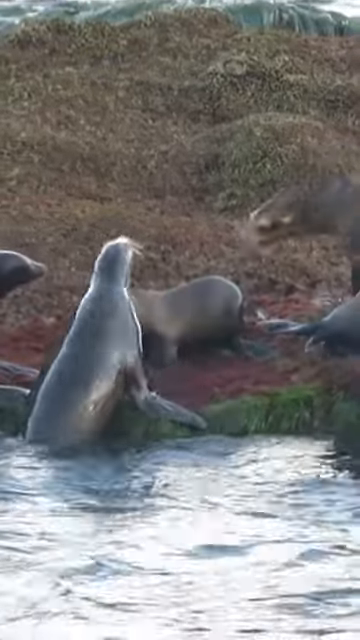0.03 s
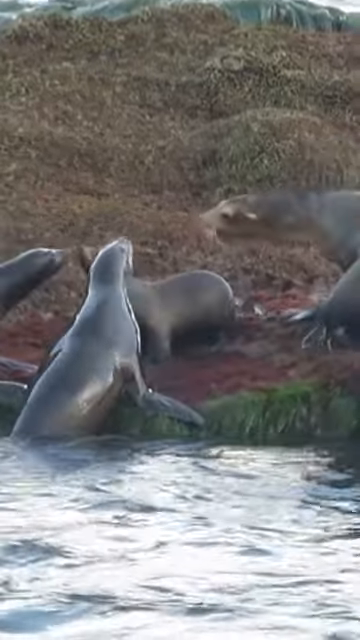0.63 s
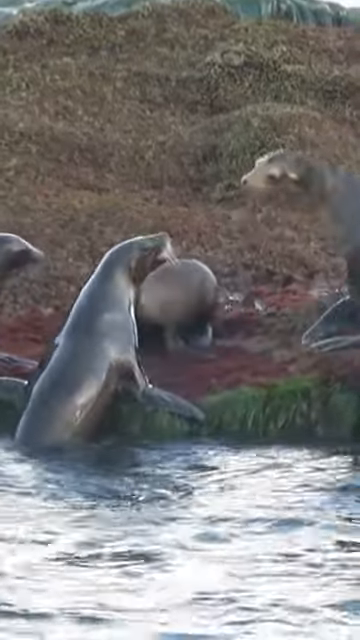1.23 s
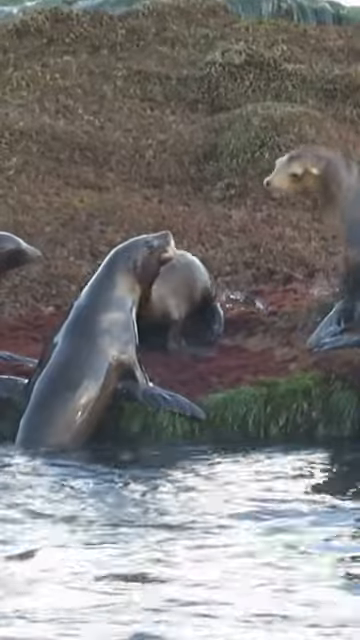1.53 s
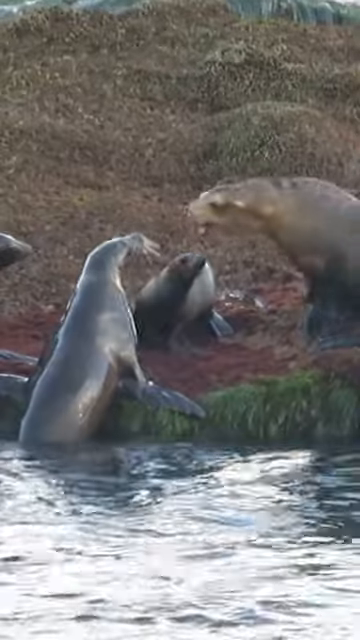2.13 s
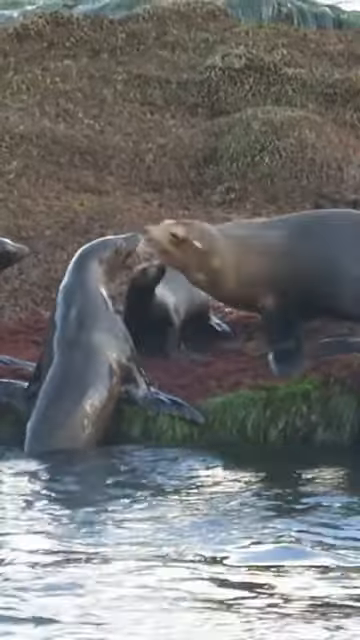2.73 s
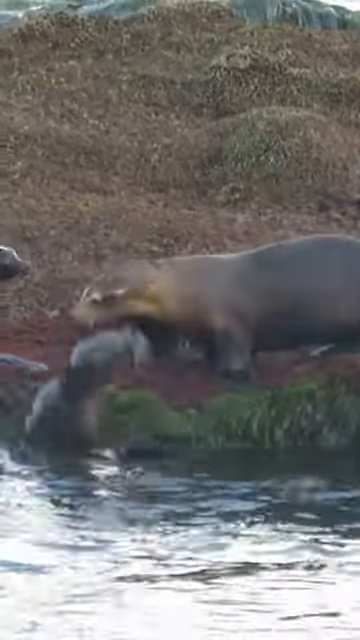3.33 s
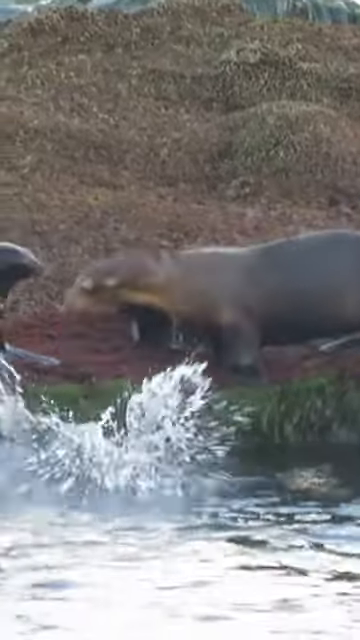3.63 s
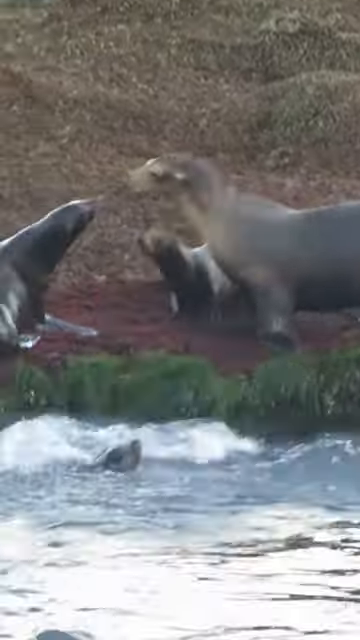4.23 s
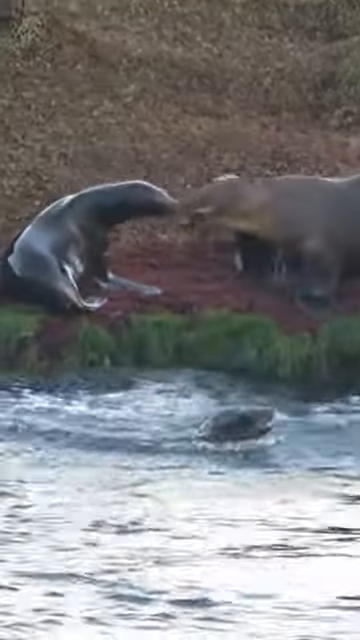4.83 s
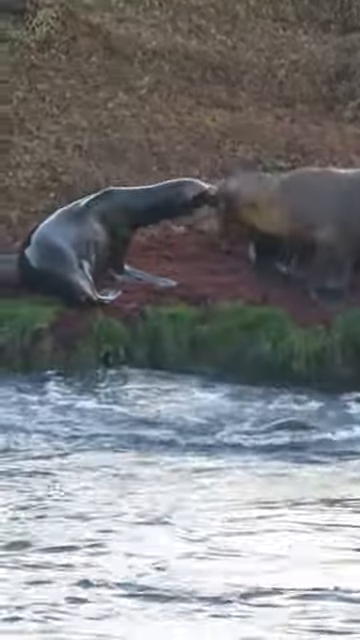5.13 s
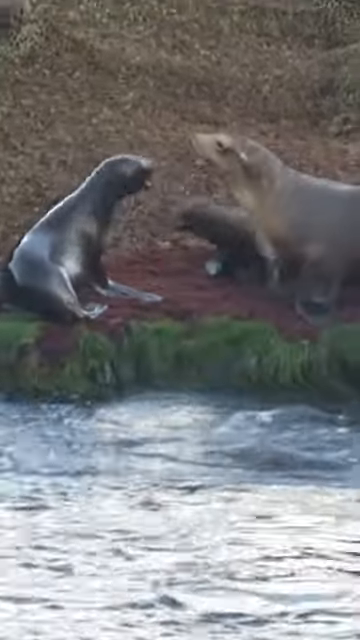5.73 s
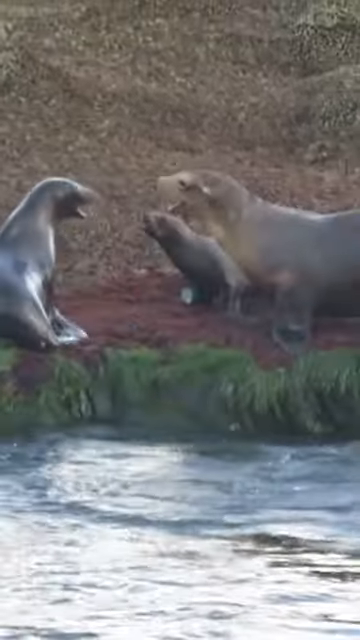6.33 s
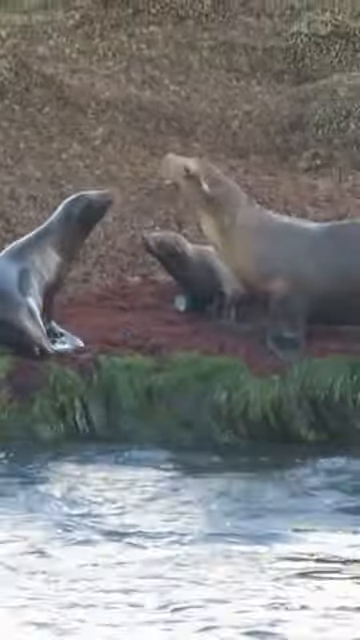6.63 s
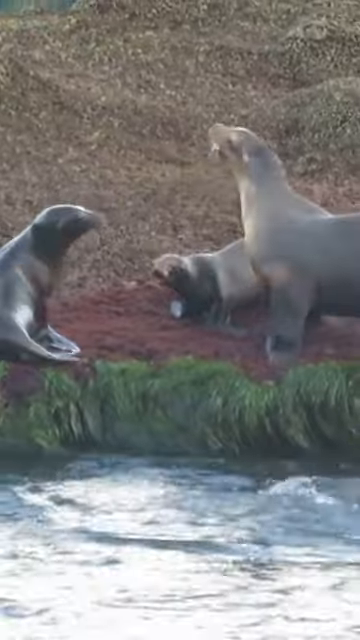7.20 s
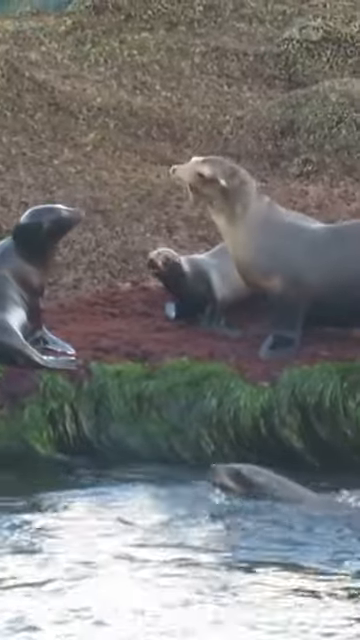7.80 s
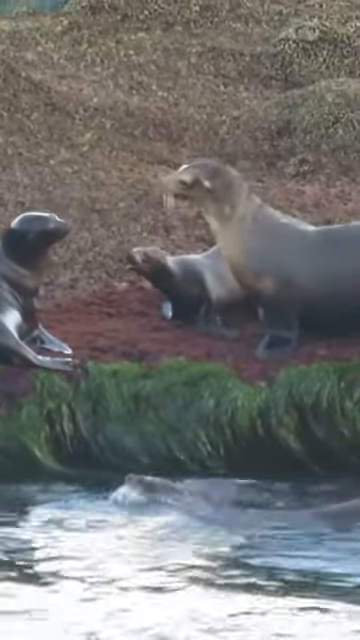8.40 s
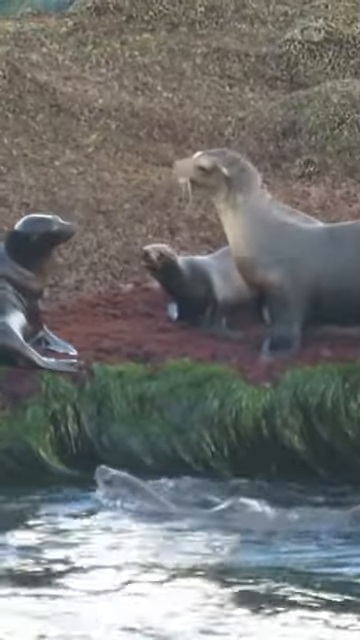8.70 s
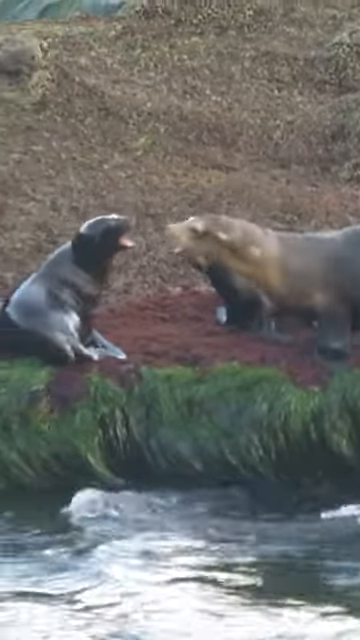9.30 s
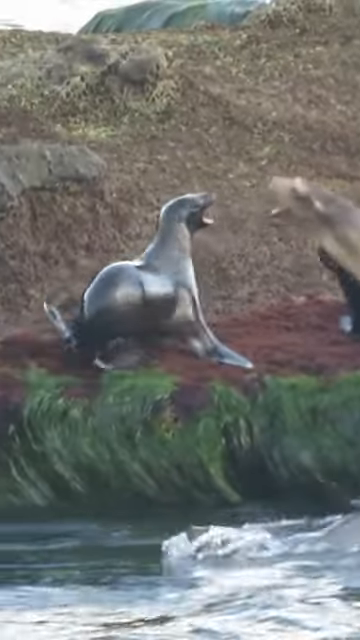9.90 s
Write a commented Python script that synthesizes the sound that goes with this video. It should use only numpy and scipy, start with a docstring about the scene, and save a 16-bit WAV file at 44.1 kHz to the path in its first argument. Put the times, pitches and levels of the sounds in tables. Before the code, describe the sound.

Sea lions moan and bleat throughout on a rocky shore, some calls round and clear, others hoarse, with short swooping yelps among them. Surf rumbles behind, under a wide hiss of foam and a faint low hum. About three seconds in, the hand-held microphone takes a rebounding bump. A faint tap and one deep growl follow past the middle. Everything but the hiss sounds muffled.

```python
"""Sea lions moan, yelp and growl on a rocky shore across the water, their uneven vocal folds turning
the calls hoarse. Surf rumbles behind them, foam bubbles merge into a wide hiss, and a faint drone hums.
A hand-held camera takes one rebounding bump and later a faint tap. All but the hiss and one dry knock
is muffled, cut off steeply near 500 Hz, with the left side leading."""
import sys
import numpy as np
from scipy import signal
from scipy.fft import rfft, irfft
from scipy.io import wavfile

SR = 44100
rng = np.random.default_rng(int(sys.argv[2]) if len(sys.argv) > 2 else 0)


def wav_record(signal):
    """Record a signal, one row per channel, as 16-bit PCM in the file named by sys.argv[1]."""
    frames = np.transpose(np.atleast_2d(signal))
    bounded = np.clip(frames, -1, 1)
    # unit amplitude maps onto the largest positive 16-bit level
    quanta = np.round(bounded * 32767).astype(np.int16)
    wavfile.write(sys.argv[1], SR, quanta)


N = 438794
TIME = np.arange(N) / SR
FREQ = np.fft.rfftfreq(N, 1 / SR)


def voice(calls, harmonics, jitter, swell_db, fade_s=0.025):
    """Uneven vocal folds: each call bends along one pitch arc. Harmonics are (multiple, level_db)."""
    waver, shimmer = wander(28), wander(45)
    out = np.zeros(N)
    for start, length, start_hz, mid_hz, end_hz, peak_db, peak_at, rough in calls:
        span = (TIME > start) & (TIME < start + length)
        along = (TIME[span] - start) / length
        pitch_hz = np.polyval(np.polyfit([0, .5, 1], [start_hz, mid_hz, end_hz], 2), along)
        phase = 2 * np.pi * np.cumsum(pitch_hz * (1 + jitter * rough * waver[span])) / SR
        tone = np.sqrt(2) * sum(undb(db) * np.sin(k * phase) for k, db in harmonics)
        swell = undb(peak_db - swell_db * np.interp(along, [0, peak_at, 1], [1, 0, 1]))
        fade = np.minimum(np.minimum(along, 1 - along) * length / fade_s, 1)
        rasp = (1 + rough * shimmer[span]) / np.hypot(1, rough)
        out[span] += tone * swell * fade * rasp
    return out


# Moan cues: start_s, length_s, start_hz, mid_hz, end_hz, peak_db, peak_position (0-1), roughness (0-1)
MOANS = [ (.27, .16, 472, 466, 454, -36.5, 0.36, 0), (.44, 0.1, 450, 462, 480, -31, 0.64, 0.2),
         (.36, 0.33, 270.2, 299, 297, -34.5, 0.1, 0.77), (1.17, 0.079, 324, 343, 355, -32.5, .5, 0.5),
         (1.58, 0.41, 480.4, 433.2, 478, -38, 0.5, 0.2), (1.63, 0.36, 260.3, 264.6, 277, -32, 0.15, 0.3),
         (2.0, 0.4, 282.4, 290, 307, -36.5, 0.52, 0.55), (2.02, 0.36, 484, 490, 476, -33, 0.45, 0.54),
         (2.28, 0.44, 159.4, 214, 220, -34.5, 0.7, 0.03), (2.57, 0.49, 460.6, 472.7, 471, -34, 0, 0.71),
         (3.28, 0.21, 279, 273, 257, -35.5, 0.33, 0.1), (4.0, 0.21, 340, 329.4, 336, -34, 0, 0.15),
         (4.57, 0.25, 443, 450, 453, -35.5, 0.53, 0.35), (4.64, 0.25, 418, 415, 427, -32.5, 0.53, 0.12),
         (4.97, 0.49, 425, 440, 498, -34.5, 0.7, 0.37), (5.0, 0.45, 253, 262, 288, -37, 0.94, 0.4),
         (5.03, 0.16, 293, 285, 281, -33, 0.3, 0.3), (5.42, .46, 296, 343.7, 359, -33, 0.78, 0.33),
         (5.59, 0.25, 262.4, 245.3, 239, -28, 0.14, 0.32), (5.83, 0.24, 240.4, 229.3, 188, -36, 0.15, 0.6),
         (6.25, 0.26, 335.5, 385, 418, -36.5, 0.66, 0.28), (6.4, 0.41, 305, 320.4, 294, -36, 0.25, 0.2),
         (6.45, 0.65, 222, 222, 216.5, -35.5, 0.62, 0.41), (6.96, 0.15, 372, 363.6, 357, -38, 0.3, 0.2),
         (7.05, 0.264, 303.3, 305.4, 330, -37.5, 0.67, 0.3), (7.08, 0.13, 486, 496, 488, -35, 0.5, 0.36),
         (7.3, 1.35, 216, 222.9, 224.1, -35, 0.28, 0.26), (7.55, 0.29, 348, 352, 348, -36.5, 0.46, 0.21),
         (7.8, 0.35, 274.2, 301, 307, -34.5, 0.75, 0.3), (8.14, 0.35, 289.8, 261.3, 234, -34.5, 0.7, 0.13),
         (8.54, 0.1, 465, 483, 480, -36.5, .5, .7), (8.9, 0.7, 202, 208.7, 210, -37, 0.04, 0.4),
         (8.97, 0.22, 140.8, 154.2, 194, -33.5, .55, 0.14), (9.15, 0.25, 401.4, 366, 341, -37.5, 0.2, 0.16),
         (9.2, 0.32, 188, 165.4, 140, -39.5, 0.55, 0.33), (9.49, 0.114, 375, 381, 382, -34.5, 0.6, .25),
         (9.58, 0.3, 409.4, 402, 385, -38.5, 0.86, 0.13), ]

def moans(trim_db=-1):
    """The nearer sea lions moan and bleat in round, almost pure tones, clear or hoarse."""
    return undb(trim_db) * voice(MOANS, [(1, 0), (2, -16)], jitter=.04, swell_db=8)


# Yelp cues: start_s, length_s, start_hz, mid_hz, end_hz, peak_db, peak_position (0-1), roughness (0-1)
YELPS = [ (.885, .2, 424.3, 298.2, 365, -30.5, 0.41, 0.48),
         (1.385, 0.14, 360, 269.6, 294, -30.5, 0.46, 0.27), (3.868, 0.15, 361, 264.4, 350, -31, 0.19, .35),
         (4.36, .13, 344, 305.5, 350, -32.5, 0.54, 0.22), (4.865, 0.11, 350, 304, 335, -29.5, 0.5, .2),
         (8.98, 0.1325, 280, 289, 340, -35.5, 0.66, 0.18), (9.43, 0.17, 314.7, 309, 363, -32.5, 0.26, 0.22),
         (9.85, 0.091, 396, 307, 330, -35, 0.7, 0.24), ]

def yelps():
    """Short, brighter calls with a quicker attack, most swooping down and up again."""
    return voice(YELPS, [(1, 0), (2, -12)], jitter=.04, swell_db=5, fade_s=.018)


# Growl cue: start_s, length_s, start_hz, mid_hz, end_hz, peak_db, peak_position (0-1), roughness (0-1)
GROWL = (5.5, 0.63, 59.5, 57, 49.5, -35, 0.5, 0.16)

def growl(trim_db=1):
    """Slowly pulsing vocal folds: one deep growl, carried by its low harmonics with no fundamental."""
    return undb(trim_db) * voice([GROWL], [(2, -6), (3, 0), (4, -7), (6, -13)], jitter=.06, swell_db=8)


def far_colony(trim_db=-3, lowest_hz=135, octaves=1.5, length_s=.3, glide_oct=.0698, rough=.26, count=90):
    """Farther animals overlap in a bed of short, gliding moans that rides the surf's rumble level."""
    calls = []
    for when, pitch, stretch, slope in rng.random((count, 4)):
        length = length_s * (.5 + stretch)
        glide = glide_oct * (2 * slope - 1) * np.array([-1, 0, 1])
        arc_hz = lowest_hz * 2 ** (octaves * pitch + glide)
        calls.append((when * TIME[-1] - length / 2, length, *arc_hz, 0, .5, rough))
    chorus = voice(calls, [(1, 0)], jitter=.05, swell_db=6)
    rumble_db = automation(SURF_LEVELS)[0]
    return unit(chorus) * undb(trim_db + rumble_db)


# Surf band faders, before the trims: time_s, rumble_db, boom_db, wash_db
SURF_LEVELS = [(0.0, -41.5, -48, -53), (0.55, -43.5, -54, -45), (0.91, -39.5, -52.5, -43.5),
               (1.25, -42, -52.5, -47), (1.6, -43, -52, -46), (1.99, -43, -47.5, -42.5),
               (2.52, -41, -46.5, -47.5), (2.8, -40.5, -54, -48), (2.99, -43, -49, -40.5),
               (3.27, -40, -48.5, -46), (4.46, -41.5, -50, -43), (4.75, -39.5, -49, -41.5),
               (5.0, -41, -50, -41), (5.4, -42, -47.5, -42), (5.9, -42, -55.5, -43),
               (6.1, -40.5, -51, -42.5), (6.73, -40, -48, -46), (7.2, -39.5, -47, -47.5),
               (7.5, -42, -49, -48.5), (8.23, -41.5, -50.5, -45), (8.6, -42.5, -46, -47.5),
               (8.8, -44.5, -52.5, -51), (9.34, -43.5, -51.5, -50), (9.95, -43, -51, -43)]
# Tone colour of the surf: frequency_hz, gain_db
SURF_EQ = [(12, -37), (25, -16), (36, -21.5), (60, -7.5), (85, -8.5), (110, -4.5), (160, -2.5), (200, -4.5),
           (300, -3.5), (400, 3.5), (500, 8.5), (700, -2), (1200, -15)]

def surf(boom_trim_db=3, rumble_trim_db=7, wash_trim_db=9, churn_db=.8, crossovers_hz=(95, 320)):
    """Breakers behind the rocks: a deep boom, a rumble and a wash on top, each churning on its own."""
    rumble_db, boom_db, wash_db = automation(SURF_LEVELS)
    colour = undb(eq_curves(SURF_EQ)[0])
    above_boom, above_rumble = (1 / (1 + (hz / (FREQ + 1)) ** 12) for hz in crossovers_hz)
    bands = [(1 - above_boom, boom_db + boom_trim_db),
             (above_boom - above_rumble, rumble_db + rumble_trim_db),
             (above_rumble, wash_db + wash_trim_db)]
    return sum(noise(colour * np.sqrt(np.abs(share))) * undb(db + churn_db * wander(12))
               for share, db in bands)


# Tone colour of the foam: frequency_hz, gain_db
FOAM_EQ = [(400, 3.5), (700, -1.36), (1300, -2.5), (2300, -4.5), (3200, -6), (4160, -8), (6300, -12),
           (10700, -20), (13900, -26.5), (15500, -32)]

def foam(mid_db=-58, side_trim_db=-3.5, fizz_db=.98):
    """Countless far bubbles merge into a wide, smooth hiss whose octaves each stir a little."""
    colour = undb(eq_curves(FOAM_EQ)[0])
    octave = np.log2(np.clip(FREQ, 1000, 16000) / 1000)
    mid, side = 0, 0
    for k in range(5):
        band = colour * np.sqrt(np.maximum(1 - np.abs(octave - k), 0))
        stir = np.linalg.norm(band) * undb(fizz_db * wander(31))
        mid += stir * noise(band)
        side += stir * noise(band)
    width = undb(side_trim_db) * unit(side) * np.array([[1], [-1]])
    return undb(mid_db) * (unit(mid) + width)


# Soft hits on the camera: start_s, level_db, dull_above_hz
BUMPS = [(3.0175, -21, 230), (3.028, -13, 900), (3.0903, -23.5, 260), (3.097, -29, 420),
         (5.008, -26.5, 900)]
# Resonances of the camera in the hand: pitch_hz, gain_db, attack_s, t60_s
BODY_MODES = [(104, 7, 0.0094, 0.077), (72, -7, 0.0032, 0.14), (215, -2, 0.0063, 0.042),
              (364, 18.5, 0.0059, 0.024), (305, -12, 0.005, 0.14), (455, -13, .005, 0.054)]

def bumps():
    """A touch, a blow, two rebounds and later a faint tap each ring the camera's damped body."""
    out = np.zeros(N)
    for start, level_db, dull_hz in BUMPS:
        age = np.maximum(TIME - start, 0)
        for hz, gain_db, attack, t60 in BODY_MODES:
            strength = undb(level_db + gain_db) / (1 + (hz / dull_hz) ** 4)
            envelope = (1 - np.exp(-(age / attack) ** 2)) * undb(-60 * age / t60)
            out -= strength * envelope * np.sin(2 * np.pi * hz * age)
    return out


def knock(trim_db=-37, delay_s=.0087, spread_s=.0055, centre_hz=520, width_hz=300):
    """The contact of the hardest bump adds a short, dry burst of noise."""
    start, level_db, _ = max(BUMPS, key=lambda bump: bump[1])
    contact = np.exp(-((TIME - start - delay_s) / spread_s) ** 2)
    return undb(level_db + trim_db) * contact * noise(bell(centre_hz, width_hz))


def drone(pitch_hz=108.2, level_db=-50.5, octave_db=-9, drift_db=2):
    """A faint low tone with its octave, never quite steady in pitch or level."""
    phase = 2 * np.pi * np.cumsum(pitch_hz * (1 + .05 * wander(31.6))) / SR
    tone = np.sin(phase) + undb(octave_db) * np.sin(2 * phase)
    shimmer = 1 + .45 * wander(47)
    drift = undb(drift_db * wander(.86))
    return undb(level_db) * unit(tone * shimmer * drift)


def muffle(x, cutoff_hz=489.4, fuzz_db=-18, flutter_hz=90, buzz_db=-14, buzz_hz=93.75):
    """A brick-wall low-pass; sound near the cutoff flutters and buzzes faintly, spilling above it."""
    taps = signal.firwin(1025, cutoff_hz, window="boxcar", fs=SR)
    low = signal.fftconvolve(x, taps, mode="same")
    near_edge = irfft(rfft(low) * bell(cutoff_hz, width_hz=55), N)
    on_edge = irfft(rfft(low) * bell(cutoff_hz, width_hz=25), N)
    saw = sum(np.sin(2 * np.pi * k * buzz_hz * TIME) / k for k in range(1, 6))
    return low + undb(fuzz_db) * near_edge * wander(flutter_hz) + undb(buzz_db) * on_edge * saw


# Stereo image of the low end: frequency_hz, left_minus_right_db, left_lead_rad
LOW_STEREO = [(20, -.8, .02), (60, -3.5, .27), (85, -4.4, .48), (120, -5.1, 1.05), (160, -4, 1.46),
              (220, -2.1, 1.8), (320, -.7, 2.02), (500, -.3, 2.14)]

def low_stereo(x):
    """The muffled lows are one signal on both sides, the left leading in phase, the right louder."""
    balance_db, lead_rad = eq_curves(LOW_STEREO)
    left = rfft(x) * undb(balance_db / 2) * np.exp(1j * lead_rad)
    right = rfft(x) * undb(-balance_db / 2)
    return irfft(np.array([left, right]), N)


def undb(db):
    """Decibels to gain."""
    return 10 ** (np.asarray(db) / 20)


def unit(x):
    """Scale to rms 1."""
    return x / np.sqrt(np.mean(x ** 2))


def automation(table):
    """The columns of a timed table, sample by sample."""
    time_s, *columns = np.transpose(table)
    return [np.interp(TIME, time_s, column) for column in columns]


def eq_curves(table):
    """The columns of a frequency table, bin by bin."""
    hz, *columns = np.transpose(table)
    return [np.interp(np.log(FREQ + 1), np.log(hz), column) for column in columns]


def bell(centre_hz, width_hz):
    """A bell-shaped passband, as gain per bin."""
    return np.exp(-((FREQ - centre_hz) / width_hz) ** 2)


def noise(gain):
    """Noise of rms 1, coloured by a gain per bin."""
    return unit(irfft(rfft(rng.standard_normal(N)) * gain, N))


def wander(rate_hz):
    """Smooth random modulation of rms 1, rolling off near rate_hz."""
    return noise(bell(0, rate_hz) * (FREQ > 0))


def scene():
    """The mix: muffled surf, sea lions, drone and bumps, with the knock and the foam left open."""
    shore = surf() + moans() + yelps() + growl() + far_colony() + drone()
    return low_stereo(muffle(shore + bumps())) + knock() + foam()


def record(dry, top_hz=15700, fade_s=.004):
    """The master: a quick fade at each end, and the camera's steep cut of the top treble."""
    fade = np.minimum(np.minimum(TIME, TIME[-1] - TIME) / fade_s, 1)
    high_cut = signal.ellip(10, .1, 70, top_hz, fs=SR, output="sos")
    return signal.sosfilt(high_cut, dry * fade)


dry = scene()
out = record(dry)
wav_record(out)
```